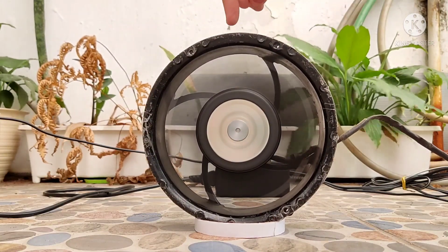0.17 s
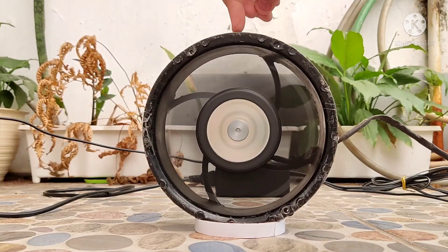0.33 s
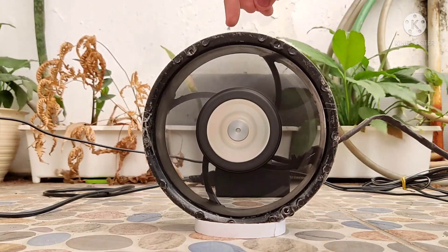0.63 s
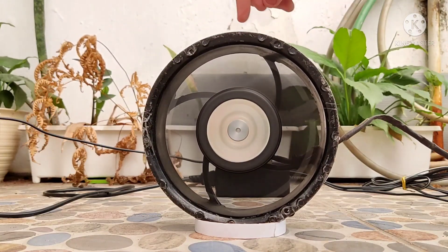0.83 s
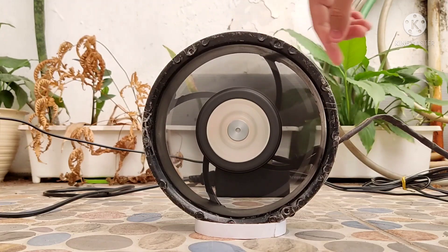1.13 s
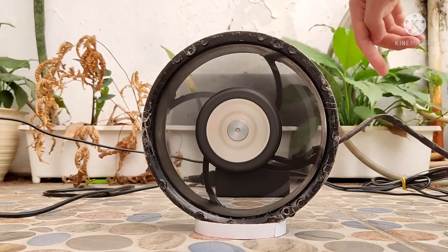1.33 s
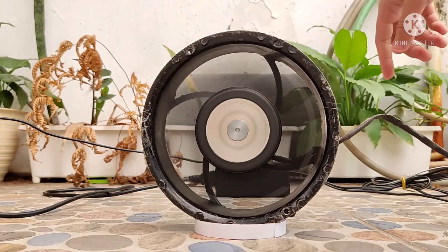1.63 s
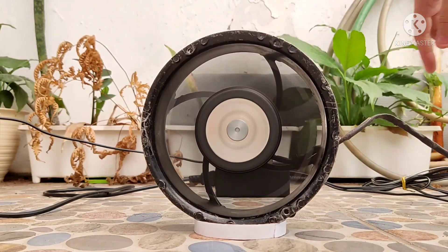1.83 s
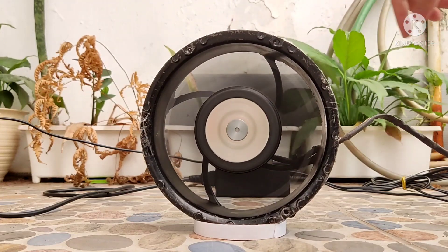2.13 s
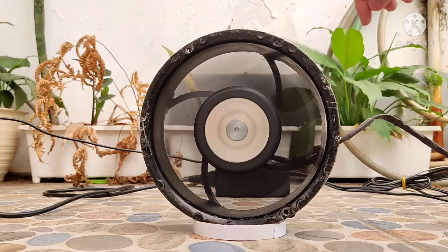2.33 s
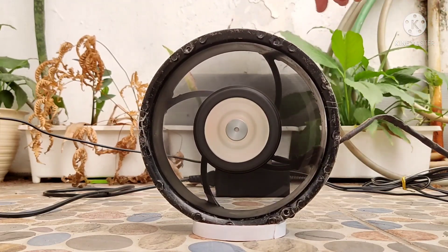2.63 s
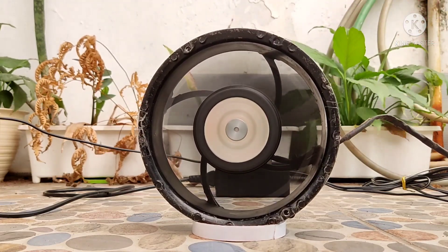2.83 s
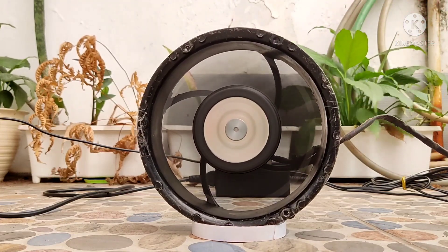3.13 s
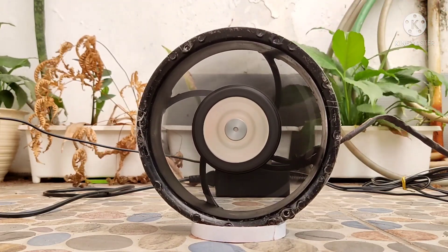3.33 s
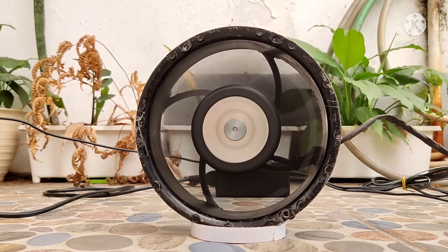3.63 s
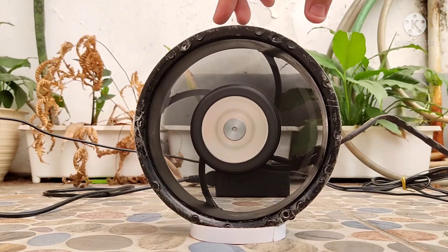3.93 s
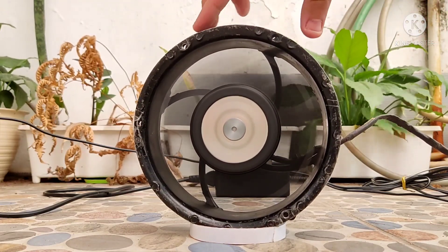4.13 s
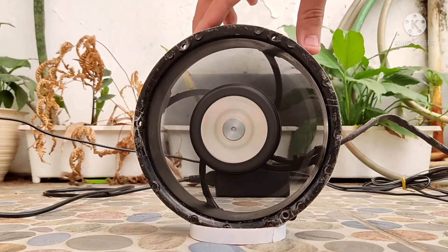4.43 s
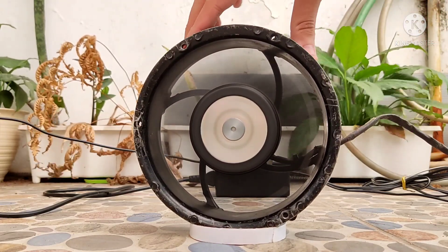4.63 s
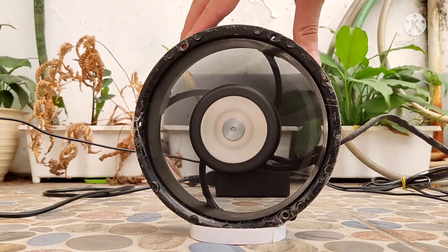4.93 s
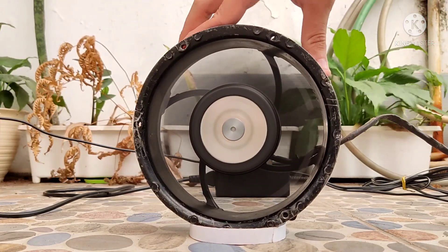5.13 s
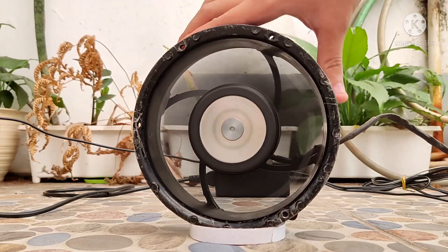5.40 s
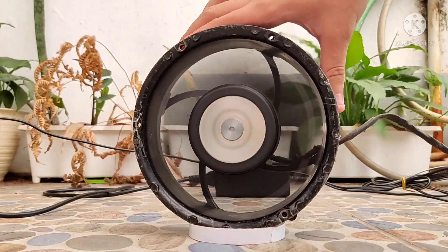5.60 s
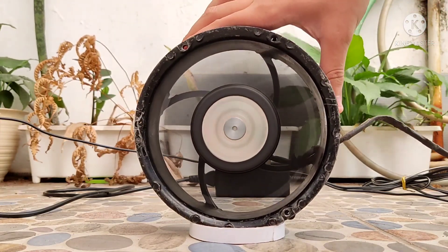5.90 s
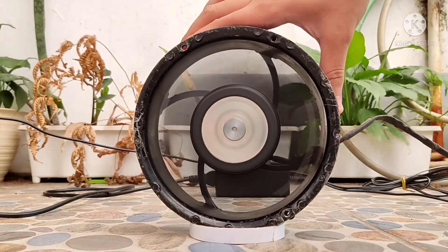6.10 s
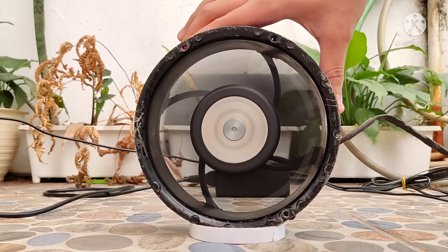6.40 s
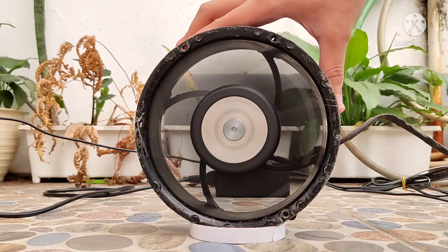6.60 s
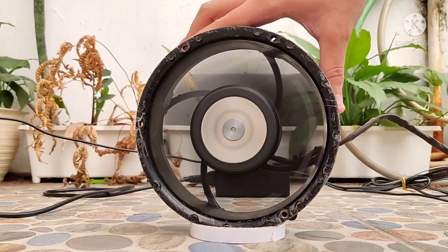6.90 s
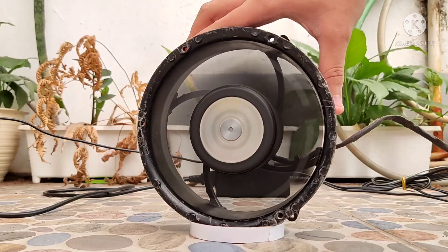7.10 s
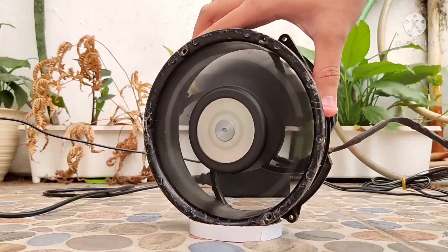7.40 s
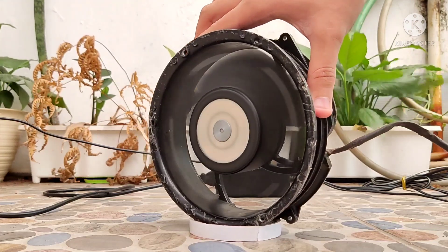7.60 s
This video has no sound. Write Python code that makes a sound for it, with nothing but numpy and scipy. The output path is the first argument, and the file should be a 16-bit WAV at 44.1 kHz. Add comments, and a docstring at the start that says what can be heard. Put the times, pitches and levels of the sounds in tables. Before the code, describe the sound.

A small axial fan whines steadily at a mid-low pitch over a broad rush of air, with one brief metallic scrape and squeal midway.

```python
"""A fan's swaying whine over a broad rush of air; once, something metallic scrapes and squeals briefly nearby.
The five-bladed axial fan spins steadily on a tiled floor, close to a pair of microphones.
The whine is sines at multiples of the shaft rate, five turns to the blade tone; a hand moving round the ring
sways it. The air is coloured stereo noise, and the scrape is gritty noise through metal resonances."""
import sys
import numpy as np
from scipy import signal
from scipy.fft import rfft, irfft, next_fast_len
from scipy.io import wavfile
from scipy.ndimage import uniform_filter1d

SR = 44100
rng = np.random.default_rng(int(sys.argv[2]) if len(sys.argv) > 2 else 0)


def how_loud(loudness_db):
    """Turn decibels into a plain amplitude multiplier (0 dB gives 1, 20 dB gives 10)."""
    steps = np.asarray(loudness_db, float) / 20
    return 10 ** steps


def to_wav(sig):
    """Store sig (one row per channel, or 1-D mono) as 16-bit WAV at the path in sys.argv[1].

    Samples outside -1..1 are clipped; the rate is SR.
    """
    pcm = np.clip(np.atleast_2d(sig), -1, 1) * 32767
    pcm = np.round(pcm).astype(np.int16)
    wavfile.write(sys.argv[1], SR, pcm.T)  # frames by channels


N = 341775   # length in samples
T = np.arange(N) / SR   # time, s
SHAFT_HZ, BLADES = 83.09, 5
LEFT_LEAD_S = .00015   # shared sound reaches the left microphone this much earlier


def rms_one(x):
    """Scales a signal to unit rms."""
    return x / np.sqrt(np.mean(np.abs(x) ** 2) + 1e-20)


def mid_rms_one(stereo):
    """Scales a stereo signal so that the mean of its two channels has unit rms."""
    return stereo / np.sqrt(np.mean(stereo.mean(0) ** 2))


def in_time(rows):
    """Draws the columns of a timed table as curves, one value a sample."""
    start_s, *columns = np.transpose(rows)
    return [np.interp(T, start_s, column) for column in columns]


def drift(rate_hz):
    """Slow chance of spread 1: noise at every 40th sample through a double one-pole low-pass."""
    pole = np.exp(-2 * np.pi * rate_hz * 40 / SR)
    noise = rng.standard_normal(N // 40 + 2002)
    slow = signal.lfilter([1], [1, -2 * pole, pole * pole], noise)[2000:]   # skip the filter's settling
    return np.interp(np.arange(N) / 40, np.arange(len(slow)), rms_one(slow))


def pan(left_over_right_db):
    """Left and right gains for a level difference, the mean of both kept at 1."""
    left, right = how_loud(left_over_right_db / 2), how_loud(-left_over_right_db / 2)
    return 2 * np.array([left, right]).reshape(2, -1) / (left + right)


def tone(shaft, order, waver, rate_hz, left_lead_rad):
    """A shaft order of rms 1; turbulence wanders its size and phase, partly separately at each microphone."""
    turning = np.exp(1j * (order * shaft + 2 * np.pi * rng.random()))
    shared = 1 + waver * (drift(rate_hz) + 1j * drift(rate_hz))
    left, right = [shared + 0.48 * waver * (drift(rate_hz) + 1j * drift(rate_hz)) for side in range(2)]
    left = rms_one(left) * turning * np.exp(1j * left_lead_rad)
    right = rms_one(right) * turning
    return np.sqrt(2) * np.real([left, right])


def air(spectrum):
    """Coloured stereo noise of mid rms 1; the part both microphones share reaches the left one first."""
    size = next_fast_len(N)
    hz = np.maximum(np.fft.rfftfreq(size, 1 / SR), 1)
    at_hz, *columns = np.transpose(spectrum)
    left_db, right_db, likeness = [np.interp(np.log(hz), np.log(at_hz), column) for column in columns]
    inside = (hz >= at_hz[0]) & (hz <= at_hz[-1])
    likeness = np.clip(likeness, 0, 1)
    first, second = rfft(rng.standard_normal((2, size)))
    late = np.exp(-2j * np.pi * hz * LEFT_LEAD_S)
    right = likeness * late * first + np.sqrt(1 - likeness ** 2) * second
    return mid_rms_one(irfft([how_loud(left_db) * first * inside, how_loud(right_db) * right * inside], size)[:, :N])


def resonate(x, modes):
    """Sums parallel two-pole resonances with alternating signs, scaled to mid rms 1."""
    out = 0
    for k, (pitch_hz, width_hz, level_db) in enumerate(modes):
        pole = np.exp(-np.pi * width_hz / SR)
        # divided by the root of the width: a wide mode passes no more noise power than a narrow one
        gain = how_loud(level_db) * (1 - pole * pole) / 2 / np.sqrt(width_hz) * (-1) ** k
        feedback = [1, -2 * pole * np.cos(2 * np.pi * pitch_hz / SR), pole * pole]
        out = out + signal.lfilter([gain, 0, -gain], feedback, x)
    return mid_rms_one(out)


def shaft_angle():
    """Shaft angle in radians; it runs slightly ahead or behind its mean turning."""
    return 2 * np.pi * SHAFT_HZ * T + .04 * drift(0.68)


# The whine sways as the inflow is disturbed: start_s [s], level_db [dB], left_over_right_db [dB]
WHINE_SWAY = [(0.0, -24.5, 7), (1.06, -26.5, 6.5), (1.7, -25, 7.5), (1.98, -30, 8.5), (2.09, -26.5, 8),
              (2.2, -29.5, 8.5), (2.44, -28, 9.5), (2.61, -31, 8.0), (3.02, -27.5, 9.0), (3.48, -32.5, 8.5),
              (4.29, -26.5, 9.0), (4.36, -30.5, 14), (4.38, -28.5, 8.5), (5.18, -35, 7.0), (5.72, -33, 9),
              (5.94, -39, 6), (6.13, -33, 7.0), (6.48, -26, 9.5), (6.73, -31, 7), (7.23, -25.5, 7.0),
              (7.68, -25, 6.5), (7.75, -28, 6.5)]


def blade_whine(shaft):
    """The blade-passing tone: each blade pushes the air once a turn, so it sounds at five times the shaft rate."""
    level_db, left_over_right_db = in_time(WHINE_SWAY)
    whine = tone(shaft, BLADES, waver=0.12, rate_hz=9.4, left_lead_rad=0.17)
    return how_loud(level_db) * pan(left_over_right_db) * whine


# Harmonics of the blade tone: shaft_order [turns], left_over_right_db [dB], left_lead_rad [rad]
BLADE_HARMONICS = [(10, 1.6, 1.1), (15, 9, 1.1), (20, -2, 1.6), (25, -1.2, .9)]
# Their slow swell: start_s [s], then level_db [dB] of the 2nd, 3rd, 4th and 5th harmonic
HARMONIC_SWELL = [(0.0, -46.5, -41, -40, -45), (0.43, -38.5, -38, -46, -44), (0.86, -38.5, -41, -48, -43),
                  (1.29, -38.5, -44.5, -47, -49), (1.72, -38.5, -51, -46, -46),
                  (2.15, -42.5, -46.5, -49, -52), (2.58, -38.5, -46.5, -48, -47),
                  (3.01, -34.5, -48, -44, -49), (3.44, -36, -43, -42, -45), (3.88, -34.5, -40.5, -44, -49),
                  (4.31, -34, -41, -46, -44), (4.74, -35, -38.5, -43, -48), (5.17, -32.5, -41, -40, -42),
                  (5.6, -35.5, -43.5, -52, -48), (6.03, -36, -44, -42, -43), (6.46, -37.5, -49, -46, -42),
                  (6.89, -33, -49, -43, -43.5), (7.32, -39.5, -40, -48, -42.5),
                  (7.75, -41, -40, -49, -37.5)]


def blade_overtones(shaft):
    """Harmonics of the blade tone, which swell slowly and also fade in and out at random."""
    out = 0
    waver_depths = [0.32, 0.37, 0.42, 0.35]
    for row, level_db, depth in zip(BLADE_HARMONICS, in_time(HARMONIC_SWELL), waver_depths):
        order, left_over_right_db, left_lead_rad = row
        overtone = tone(shaft, round(order), waver=depth, rate_hz=7.9, left_lead_rad=left_lead_rad)
        out = out + how_loud(level_db) * pan(left_over_right_db) * overtone
    return out


# Weaker tones between the blade harmonics and beyond: shaft_order [turns], left_db [dB], right_db [dB]
WEAK_ORDERS = [(1, -60, -60), (4, -53, -58), (7, -52, -52), (8, -53, -47), (12, -58, -59), (13, -50, -55),
               (14, -55, -58), (18, -55, -61), (21, -53, -56), (22, -51, -54), (23, -53, -60),
               (24, -49, -57), (30, -58, -54), (33, -62, -56), (35, -56, -55), (38, -66, -57),
               (40, -52, -51), (80, -60, -60)]


def shaft_tones(shaft):
    """Unequal blades and struts sound weakly at other multiples of the shaft rate."""
    out = 0
    for order, *sides_db in WEAK_ORDERS:
        # capped: high tones arrive by mixed paths
        lead = min(2 * np.pi * round(order) * SHAFT_HZ * LEFT_LEAD_S, 1.2)
        out = out + how_loud(sides_db)[:, None] * tone(shaft, round(order), waver=0.29, rate_hz=6.3, left_lead_rad=lead)
    return out


# Low air as the ring is gripped and turned: start_s [s], buffeting_db [dB], drone_db [dB]
LOW_AIR_LEVELS = [(0, -48.5, -46), (.5, -47, -55), (1.0, -49, -46.5), (2.0, -48, -56.5), (3.0, -48.5, -49),
                  (3.8, -45.5, -45), (4.5, -45.5, -51), (5.0, -48.5, -50), (5.6, -43.5, -51),
                  (6.5, -45, -52.5), (7.1, -46.5, -42.5), (7.75, -46.5, -46)]
# Colour of the buffeting: pitch_hz [Hz], left_db, right_db [relative dB per Hz], likeness [0-1]
BUFFETING_COLOUR = [(20, -26, -37, .6), (55, -18, -17, .85), (78, -10.5, -9, 0.85), (114, -4.5, -5, 0.85),
                    (158, -4, -3.5, 0.97), (271, -1.5, -1, 0.92), (337, -14, -1, 0), (504, -34, -26, .7)]
# Colour of the ring's drone: pitch_hz [Hz], left_db, right_db [relative dB per Hz], likeness [0-1]
DRONE_COLOUR = [(118, -25, -27, .97), (156.5, -2, 1, 0.88), (168.3, 2, 1.5, 1), (190, -3, -2, 0.81),
                (231, -22, -29, 0.96)]


def low_air():
    """Buffeting and a low drone of the ring: low noise bands that come in lumps."""
    buffeting_db, drone_db = in_time(LOW_AIR_LEVELS)
    buffeting = how_loud(buffeting_db + 1.0 * drift(2.6)) * air(BUFFETING_COLOUR)
    drone = how_loud(drone_db + 1.0 * drift(2.6)) * air(DRONE_COLOUR)
    return buffeting + drone


# Colour of the rush: pitch_hz [Hz], left_db, right_db [relative dB per Hz], likeness [0-1]
RUSH_COLOUR = [(202, -55, -44, 0.56), (390, 6, -21, 0.52), (435, 4.5, -11, 0.98), (606, -1, 6, 1),
               (730, -2, -2, 0.29), (835, 5.5, -16, 0.86), (1150, 0.5, 1, 0.36), (1420, 2, -1.5, 0.21),
               (1780, 4, 0.5, 0.34), (2183, 2, 2.5, 0.11), (2130, -1.5, -3, 0.1), (2760, -2.5, -2.5, 0.1),
               (3390, -4.5, -1.5, 0.17), (4066, -18, -18, 0.16)]
# Colour of the hiss: pitch_hz [Hz], left_db, right_db [relative dB per Hz], likeness [0-1]
HISS_COLOUR = [(3470, -20, -16, .3), (4120, -5.5, -12.5, 0.55), (4620, -7.5, -5, 0.33),
               (5070, -3.5, -6, 0.1), (5900, -3, -1, 0.076), (7600, 1, -4, 0.046), (7870, -6, 1, 0.11),
               (8780, 6, -2.5, 0.11), (9560, 1, -3.5, .1), (10000, -9, 0.5, .05), (11520, -12, -5.5, .05),
               (11680, -19, -16, .05)]


def rush_and_hiss():
    """Middle and high air noise flickers and throbs slightly at the blade rate; turning the fan away dulls it."""
    throb_db = 0.23 * np.cos(2 * np.pi * BLADES * SHAFT_HZ * T)
    rush = how_loud(-37.5 + 0.9 * drift(11.5) + throb_db) * air(RUSH_COLOUR)
    turned_away_db = 1.0 * np.maximum(T - 6.7, 0)   # the hiss loses 1 dB per s from 6.7 s
    hiss = how_loud(-41.5 - turned_away_db + 0.57 * drift(25.0) + throb_db) * air(HISS_COLOUR)
    return rush + hiss


# The scrape's three layers: start_s [s], squeal_db [dB], ring_db [dB], rasp_db [dB]
SCRAPE_LEVELS = [(4.2, -60, -54, -54.5), (4.228, -38, -51, -37.5), (4.258, -31.5, -47, -26.5),
                 (4.286, -40, -37, -26.5), (4.312, -25.5, -41, -37), (4.336, -24, -23, -27.5),
                 (4.392, -32, -28.5, -47), (4.522, -53, -43, -54.5), (4.56, -51.5, -49, -53.5)]
# Bursts where the squeal catches: centre_s [s], boost_db [dB at the squeal], spread_s [s, Gaussian]
SQUEAL_CATCHES = [(4.315, 4.5, .006), (4.338, 5.5, .004), (4.367, 4.5, 0.0086), (4.386, 2, .005)]
# What the scraped metal squeals with: pitch_hz [Hz], width_hz [Hz], level_db [relative dB]
METAL_SQUEAL = [(2500, 37, 1.5), (4905, 40, 3.5), (7100, 84, -3), (9740, 44, -3.5), (10020, 45, -0.5),
                (11200, 590, -3.5), (13000, 900, -2)]
# The cluster that rings on: pitch_hz [Hz], width_hz [Hz], level_db [relative dB]
METAL_RING = [(5160, 240, -9), (5800, 160, -6.5), (5910, 100, -5.5), (6220, 290, -2), (6700, 60, -4),
              (6980, 120, -8)]
# The broader rasp: pitch_hz [Hz], width_hz [Hz], level_db [relative dB]
METAL_RASP = [(3080, 480, -3.5), (3450, 480, -11), (4270, 330, -10), (5000, 540, -6), (5900, 790, -5.5),
              (7500, 72, -11), (8580, 54, -2), (8540, 1500, 2.5), (9460, 200, -1), (10700, 900, -12)]
# At its height the scrape cuts out twice on the right: start_s [s], end_s [s], depth_db [dB]
RIGHT_DROPOUTS = [(4.331, 4.334, -16), (4.345, 4.353, -18)]


def scrape():
    """Gritty friction drives a squeal leaning right that catches in bursts, a ringing cluster, and a rasp."""
    before = [(0.0, -120, -120, -120), (4.19, -90, -90, -90)]
    after = [(4.62, -90, -90, -90)]
    squeal_db, ring_db, rasp_db = in_time(before + list(SCRAPE_LEVELS) + after)
    catch_db = 0.84 * drift(70.0)   # uneven rubbing
    for centre_s, boost_db, spread_s in SQUEAL_CATCHES:
        catch_db = catch_db + boost_db * np.exp(-.5 * ((T - centre_s) / spread_s) ** 2)
    # noise whose level jumps at random from sample to sample
    grit = rng.standard_normal((3, 2, N)) * how_loud(4.0 * rng.standard_normal((3, 2, N)))
    squeal = resonate(grit[0] * how_loud(catch_db), METAL_SQUEAL)
    ring = resonate(grit[1] * how_loud(0.45 * catch_db), METAL_RING)
    rasp = resonate(grit[2] * how_loud(0.75 * catch_db), METAL_RASP)
    out = how_loud(squeal_db) * pan(-7.5) * squeal + how_loud(ring_db) * pan(-1.3) * ring + how_loud(rasp_db) * pan(1.2) * rasp
    cut_db = sum(depth_db * ((T > start_s) & (T < end_s)) for start_s, end_s, depth_db in RIGHT_DROPOUTS)
    out[1] *= uniform_filter1d(how_loud(cut_db), size=40)   # edges softened over 40 samples
    return out


def scene():
    """Fan tones on one shaft, the air they stir, and the scrape."""
    shaft = shaft_angle()
    fan_tones = blade_whine(shaft) + blade_overtones(shaft) + shaft_tones(shaft)
    return fan_tones + low_air() + rush_and_hiss() + scrape()


def band_limit(x):
    """A steep low-pass at the top of the band."""
    return signal.sosfilt(signal.butter(12, 14130, fs=SR, output="sos"), x)


def record(dry):
    """The recorder drops a narrow band near 12 kHz and weakens all above it, where only the scrape reaches."""
    gap_from_hz, gap_to_hz, above_gap_db = 11720, 12450, -15.0
    size = next_fast_len(N)
    hz = np.fft.rfftfreq(size, 1 / SR)
    keep = np.where(hz < gap_from_hz, 1, how_loud(above_gap_db) * (hz > gap_to_hz))
    mix = irfft(rfft(dry, size) * keep, size)[:, :N]
    return band_limit(mix)


dry = scene()
out = record(dry)
to_wav(out)
```